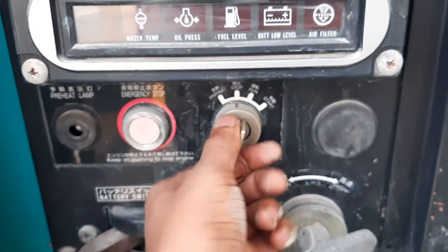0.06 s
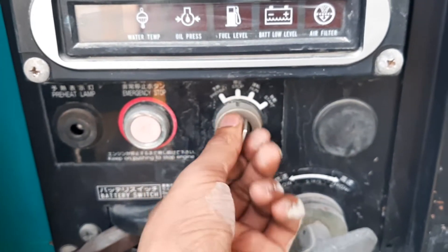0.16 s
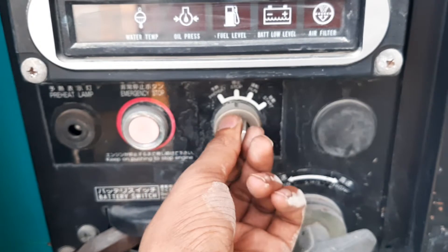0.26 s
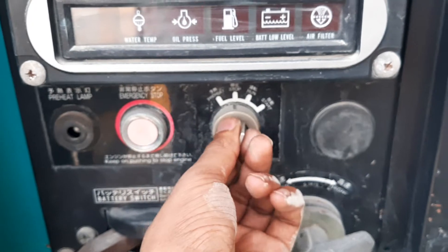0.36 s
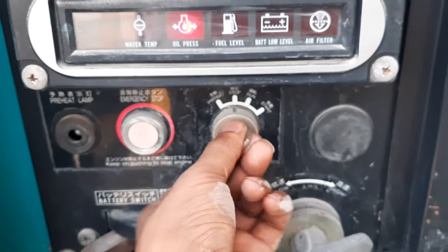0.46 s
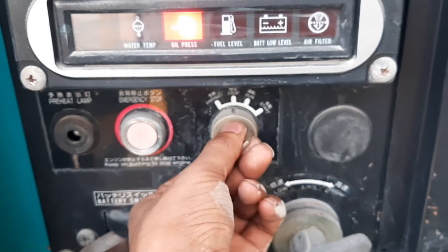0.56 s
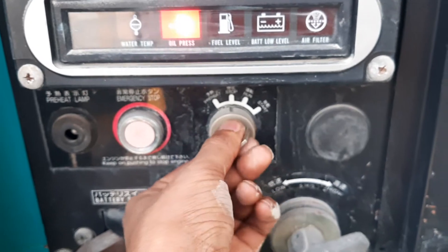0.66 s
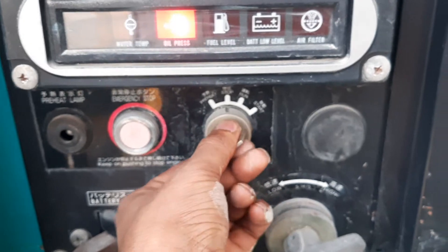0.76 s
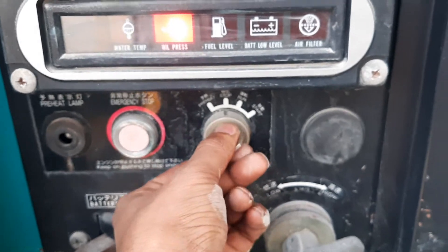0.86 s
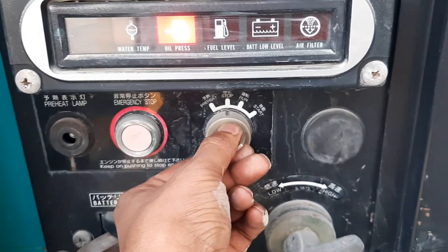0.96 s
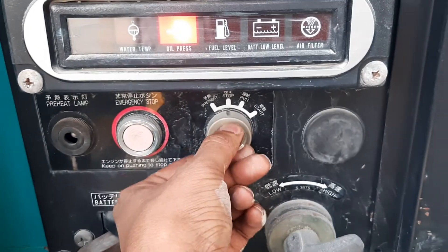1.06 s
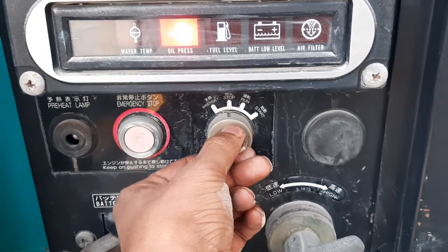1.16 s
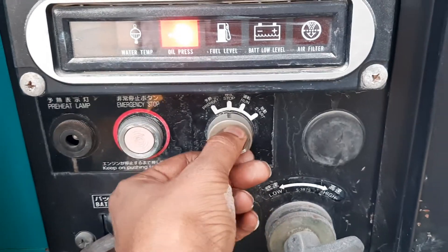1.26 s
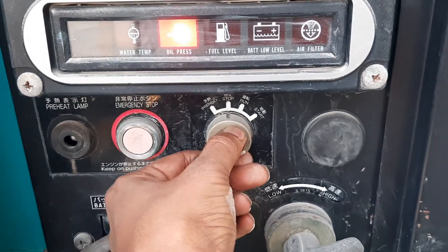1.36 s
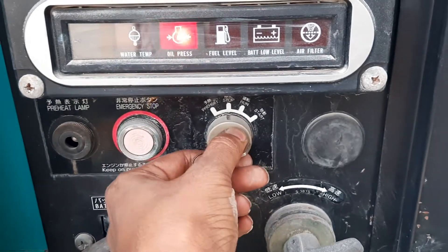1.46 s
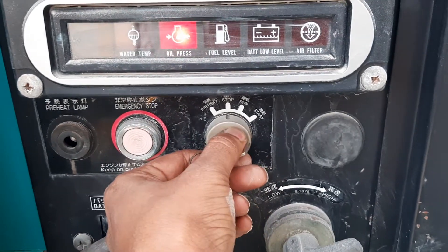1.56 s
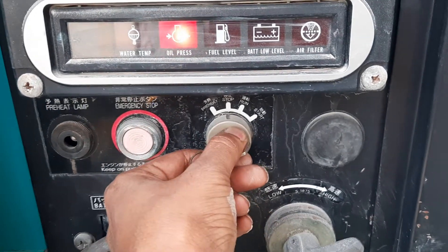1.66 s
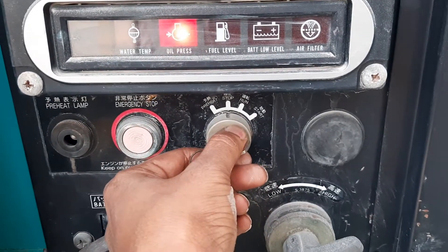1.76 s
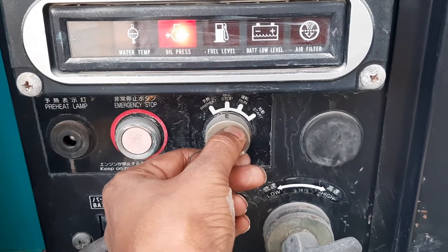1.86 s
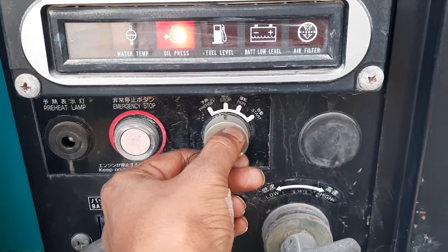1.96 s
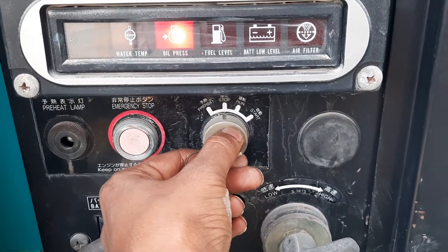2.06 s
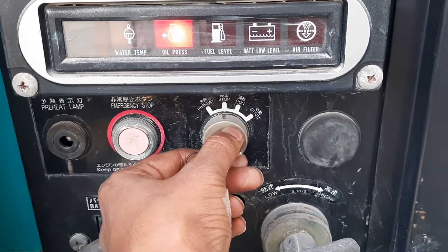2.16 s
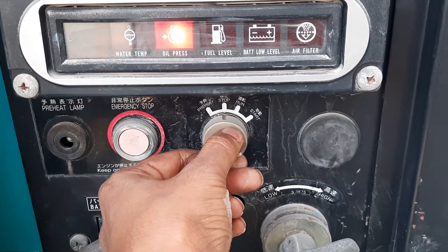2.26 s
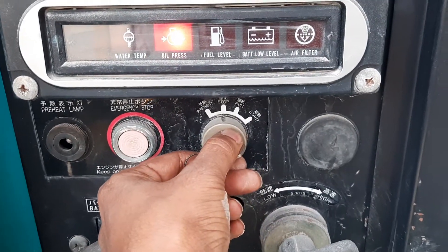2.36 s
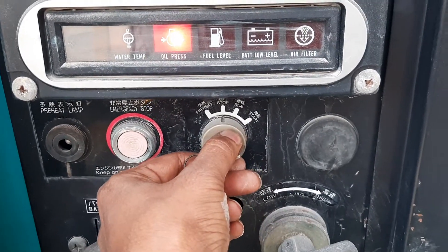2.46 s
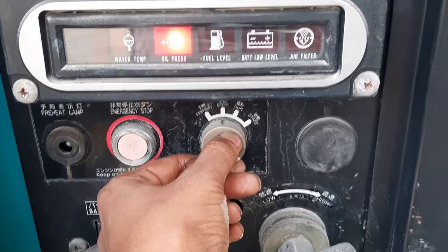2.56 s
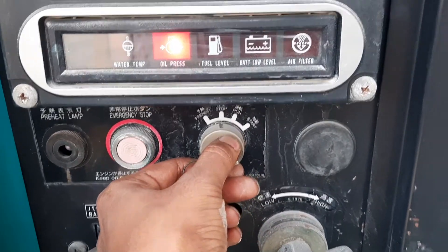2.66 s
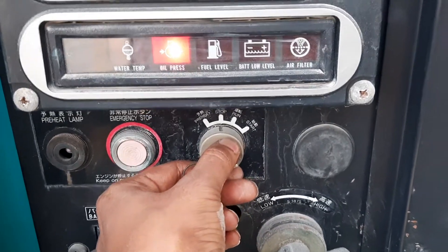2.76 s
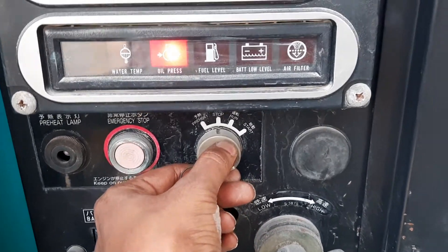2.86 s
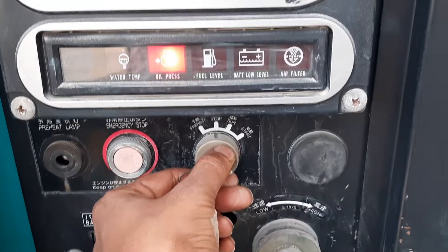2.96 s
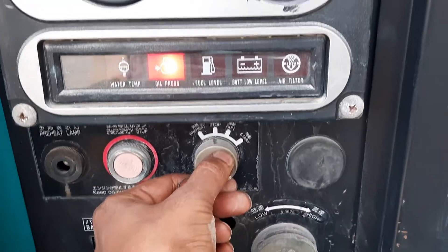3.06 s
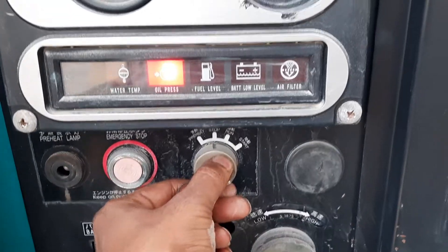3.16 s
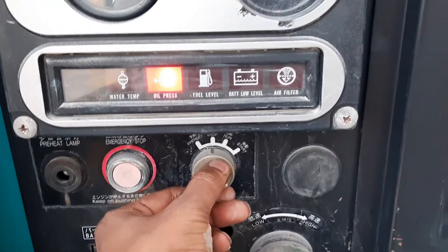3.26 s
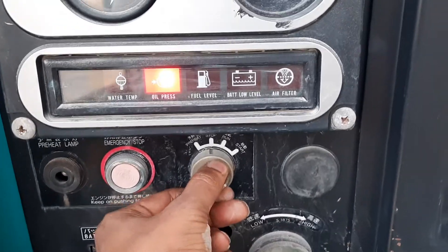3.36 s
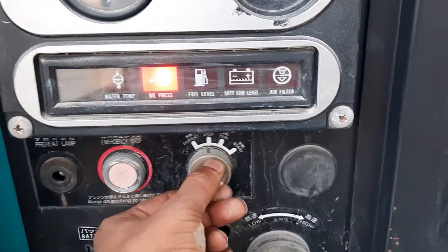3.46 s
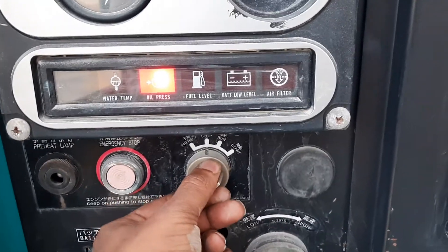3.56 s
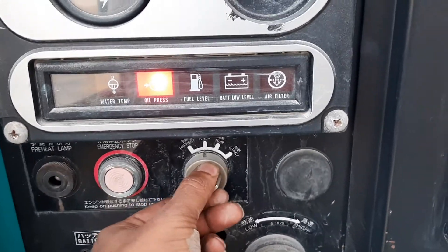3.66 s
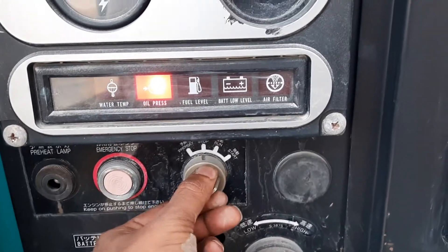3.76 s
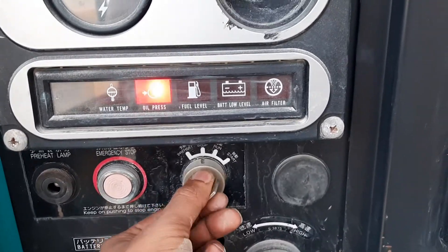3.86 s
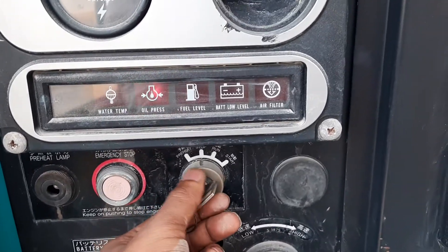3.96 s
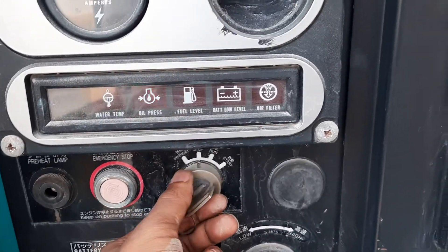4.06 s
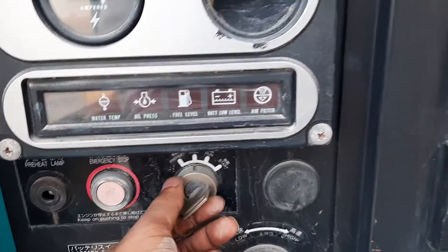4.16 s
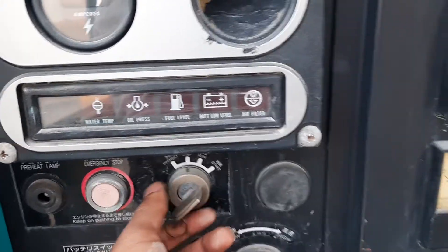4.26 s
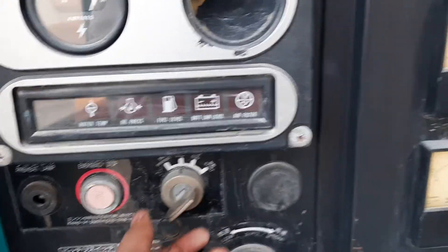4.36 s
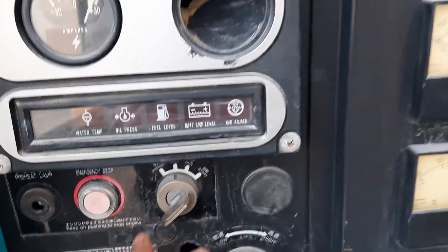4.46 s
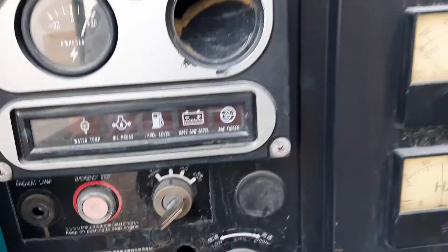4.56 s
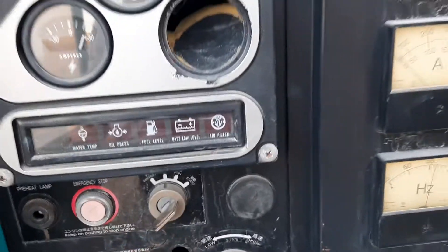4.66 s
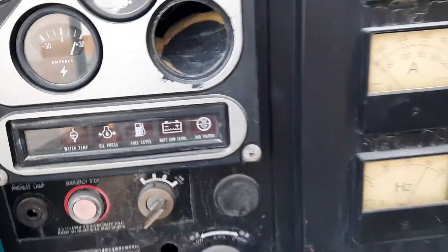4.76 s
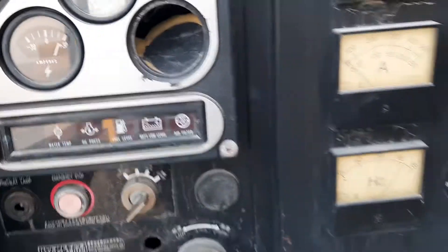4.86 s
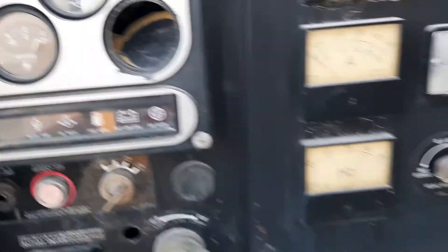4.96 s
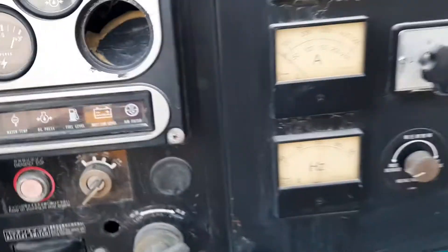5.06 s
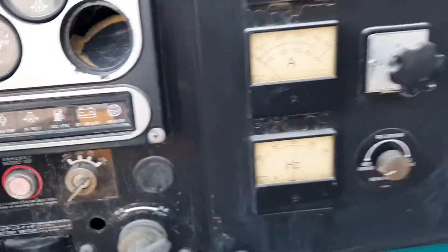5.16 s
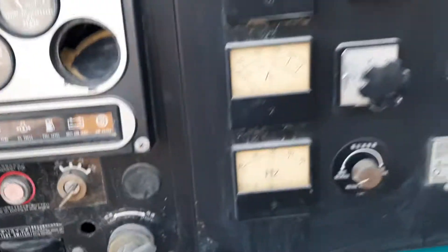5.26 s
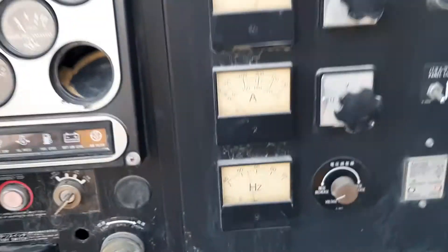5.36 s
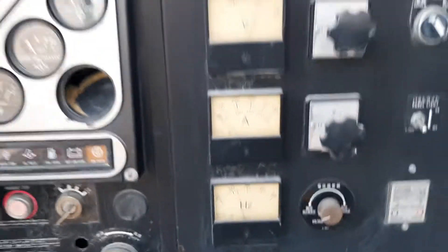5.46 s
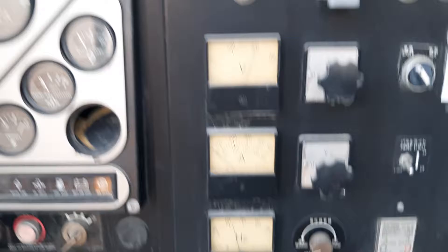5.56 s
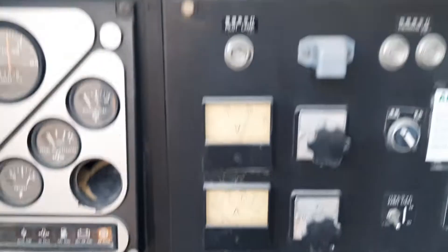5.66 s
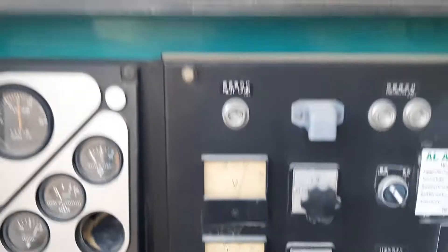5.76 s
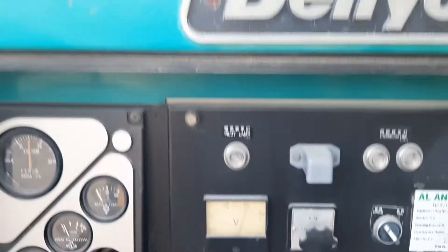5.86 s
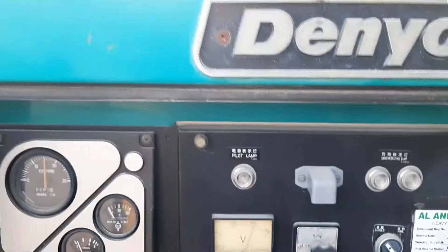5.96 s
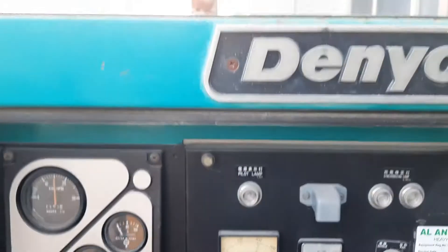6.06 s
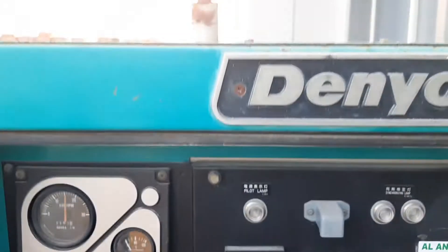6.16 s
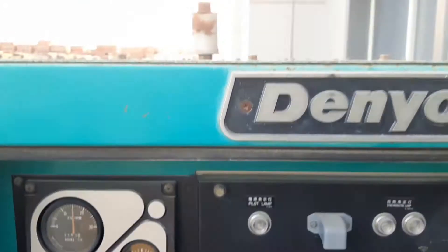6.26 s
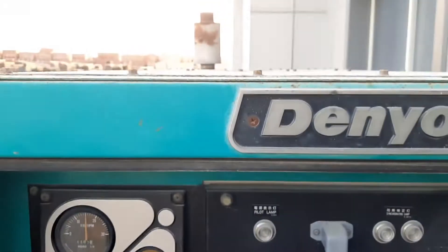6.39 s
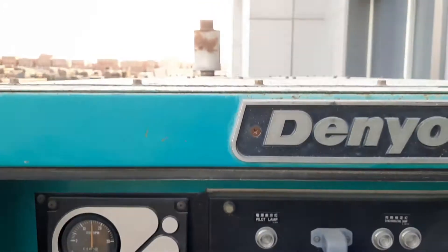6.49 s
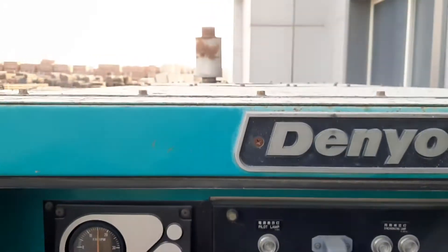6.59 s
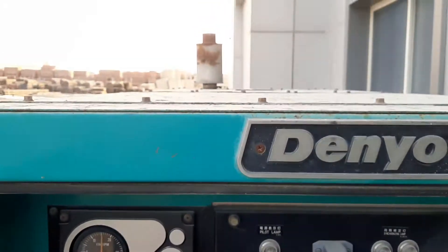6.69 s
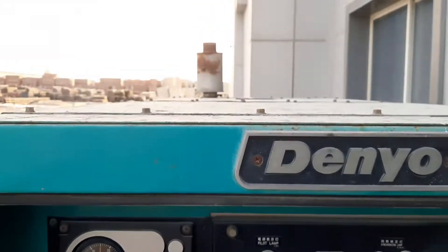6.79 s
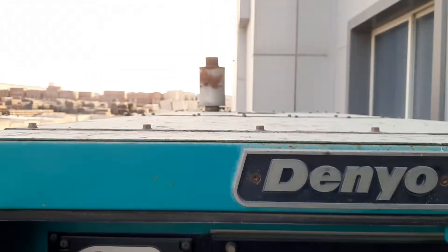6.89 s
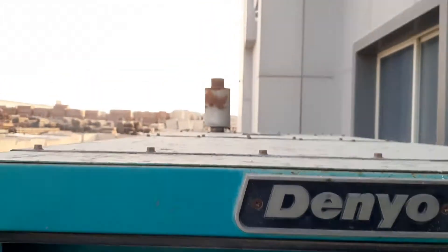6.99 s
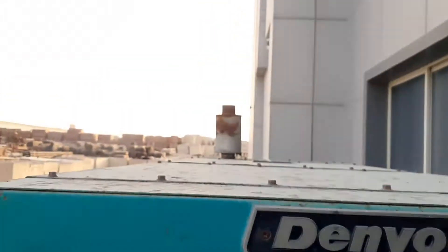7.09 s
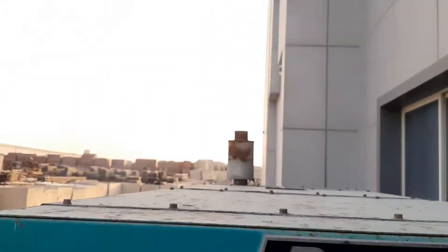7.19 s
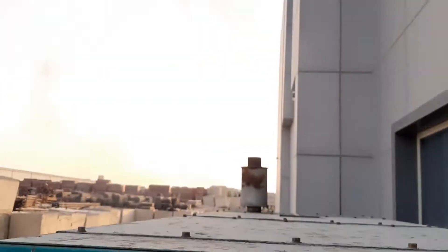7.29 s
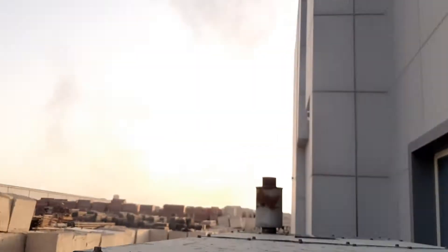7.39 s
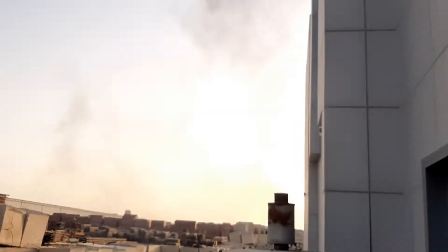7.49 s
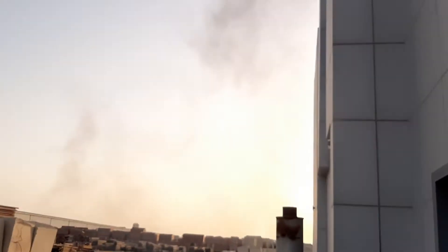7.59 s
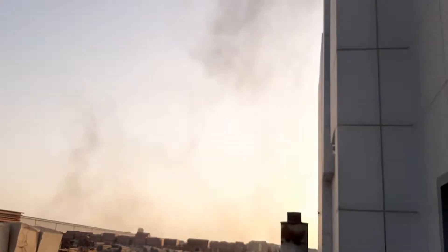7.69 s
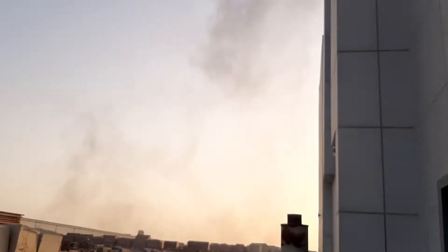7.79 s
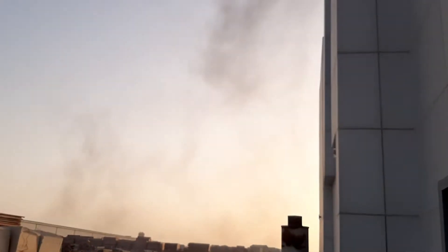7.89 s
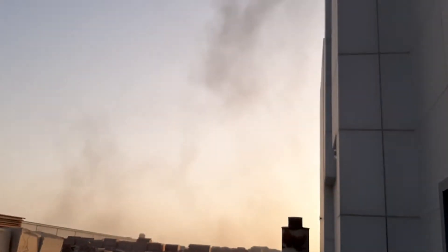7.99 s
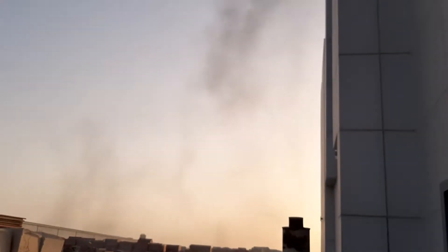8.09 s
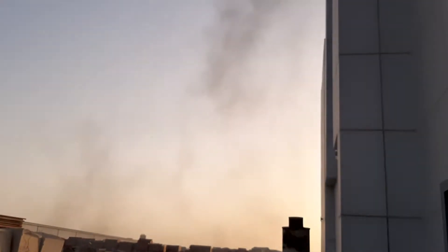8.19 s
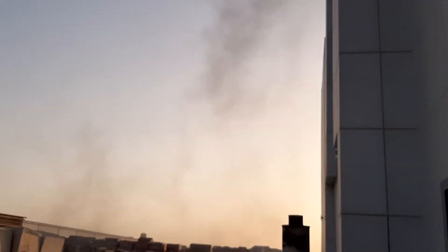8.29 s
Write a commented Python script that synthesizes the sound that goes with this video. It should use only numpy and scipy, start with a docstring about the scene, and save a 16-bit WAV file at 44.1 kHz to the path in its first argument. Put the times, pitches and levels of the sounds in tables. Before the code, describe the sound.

A handheld stereo microphone near a steel generator housing, slightly louder on the right. Key nudges and sharp clicks come first, then a boomy relay thump. A metallic slam starts gritty, surging gear whine with brief squeaks; deep firing jolts shake doors and latches into a rattle. The engine accelerates, blares briefly, then holds a droning, clattering, hissing run, less boxy and more open to exhaust puffs by the end.

```python
"""Over the low sound of distant machinery, a key clicks softly, then louder, and a relay thumps a housing.
A solenoid slams in and starter gears howl in surges: a train of tooth pushes rings through a filter.
A six-cylinder diesel generator catches, shakes its sheet-metal doors into a rattle and climbs to about 1500 rpm.
Filtered noise and ringing strokes make its thuds, knocks and hiss.
Tones that follow the shaft speed make the exhaust note and the drone of the fan."""
import sys
import numpy as np
from scipy import signal
from scipy.fft import rfft, irfft, next_fast_len
from scipy.io import wavfile
from scipy.ndimage import uniform_filter1d, map_coordinates

SR = 44100
rng = np.random.default_rng(int(sys.argv[2]) if len(sys.argv) > 2 else 0)


def file_out(sig):
    """Save sig as 16-bit WAV at sys.argv[1]."""
    # one column per channel
    cols = np.atleast_2d(sig).T
    # limit, then scale
    lim = np.clip(cols, -1, 1)
    pcm = np.round(lim * 32767).astype(np.int16)
    wavfile.write(sys.argv[1], SR, pcm)


N = 367353  # length in samples
TIME = np.arange(N) / SR  # seconds
FREQS = np.fft.rfftfreq(N, 1 / SR)  # Hz


def amp(db):
    """Turns decibels into a gain."""
    return 10 ** (np.asarray(db) / 20)


def unit(x):
    """Scales a sound so that the mean of its channels has rms 1."""
    middle = np.atleast_2d(x).mean(0)
    return x / np.sqrt(np.mean(middle ** 2) + 1e-20)


def ramp(start, end):
    """Rises from 0 to 1 between two times in seconds."""
    return np.clip((TIME - start) / max(end - start, 1e-3), 0, 1)


def read(points, hz):
    """Reads a curve whose points are joined by straight lines on a log frequency axis."""
    point_hz, value = np.transpose(points)
    return np.interp(np.log(hz + 1), np.log(point_hz + 1), value)


def noise(size=N):
    """Two unrelated white noises, one for each channel."""
    return rng.standard_normal((2, size))


def drift(hz):
    """Slow random wandering of rms 1, with about hz new values a second."""
    knots = rng.standard_normal(4000)
    coarse = map_coordinates(knots, [TIME[::50] * hz], order=3, mode="wrap")
    return unit(coarse.repeat(50)[:N])


def blow(s, t60, rise=0.0075):
    """Envelope of one blow: a quick rise, then a steady decay that loses 60 dB in t60 seconds."""
    out = np.zeros(N)
    part = out[round(s * SR):][:int(2 * t60 * SR)]
    age = TIME[:len(part)]
    part += (1 - np.exp(-age / rise)) * np.exp(-np.log(1000) * age / t60)
    return out


def held(start, length, rise, t60):
    """Envelope that rises, holds and dies away."""
    age = np.maximum(TIME - start, 0)
    release = amp(-60 * np.clip((age - length) / t60, 0, 10))
    return (1 - np.exp(-age / rise)) * release


# how alike the two microphones hear each pitch: pitch_hz, likeness (1 = the same, 0 = unrelated)
MIC_LIKENESS = [(60, 1), (160, .99), (250, 0.95), (500, .6), (1000, 0.28), (2000, 0), (4000, 0)]


def colour(x, points, modes=()):
    """Filters noise by a spectrum and its resonances; the microphones share the bass but not the treble."""
    size = 2 * next_fast_len(N // 2 + 8192)
    hz = np.fft.rfftfreq(size, 1 / SR)
    peaks = sum(gain / (1 + (2 * (hz - mode_hz) / width) ** 2) for mode_hz, width, gain in modes)
    db = read(points, hz) + peaks
    # folding the cepstrum makes the filter answer only after each input, never before it
    cepstrum = irfft(np.log(amp(np.maximum(db, -100))))
    cepstrum[1:size // 2] *= 2
    z = rfft(x, size) * np.exp(rfft(cepstrum[:size // 2], size))
    same = np.clip(read(MIC_LIKENESS, hz), -1, 1)
    left = same * z[1] + np.sqrt(1 - same ** 2) * z[0]
    return irfft(np.array([left, z[1]]))[:, :N]


def tones(turns, orders, hz, waver):
    """Wavering harmonics of a turning part; the higher ones reach the two microphones out of step."""
    out = np.zeros((2, N))
    for k, db in orders:
        # hz is a nominal pitch, used only to set the phase gap between the microphones
        apart = np.arccos(np.clip(read(MIC_LIKENESS, k * hz), .3, 1)) * rng.choice([-.5, .5])
        phase = 2 * np.pi * (round(k) * turns + rng.random()) + waver * drift(7.4)
        strength = amp(db) * np.sqrt(2) * (1 + waver * drift(12))
        out += strength * np.cos(np.float32([phase + apart, phase - apart]))
    return out


def housing(x, t60):
    """Dense short echoes between the steel walls, different for each microphone."""
    t = np.arange(SR // 5) / SR
    echoes = noise(len(t)) * amp(-60 * t / t60)
    return signal.oaconvolve(np.atleast_2d(x), echoes, axes=1)[:, :N]


# tone of the distant machinery: pitch_hz, relative_db
YARD_SPECTRUM = [(25, -6), (58, 5), (100, -0.5), (160, 3.5), (250, -4.5), (400, -15.5), (650, -19.5),
                 (1000, -24.5), (1550, -27.5), (2500, -44.5), (8000, -56.5), (13500, -46.5), (16000, -49)]


def yard():
    """Low, steady sound of distant machinery, made from filtered noise."""
    return amp(-46) * unit(colour(noise(), YARD_SPECTRUM))


NUDGE_T60_S = 0.091
# fingers nudge the key in its barrel: start_s, level_db
KEY_NUDGES = [(0.098, -51), (0.184, -52), (0.474, -36)]


def nudges():
    """Fingers nudge the key in its barrel, each time with a short burst of noise."""
    spectrum = [(900, -22.0), (1550, 5.0), (1800, -7), (2050, -6), (2700, -25.5), (8000, -34)]
    bursts = sum(amp(db) * blow(s, NUDGE_T60_S) for s, db in KEY_NUDGES)
    return bursts * unit(colour(noise(), spectrum))


# the key rattles in its barrel, each bounce weaker than the last
BOUNCE_S, BOUNCE_GAP_S, BOUNCE_T60_S = .556, 0.023, 0.078
BOUNCE_DB, BOUNCE_LOSS_DB = -33.5, 1.5


def bounces(count=4):
    """Envelope of the key rattling to rest in evenly spaced, weakening bounces."""
    return sum(amp(BOUNCE_DB - k * BOUNCE_LOSS_DB) * blow(BOUNCE_S + k * BOUNCE_GAP_S, BOUNCE_T60_S)
               for k in range(count))


# key and switch contacts: start_s, level_db, t60_s
CONTACT_CLICKS = [(0.097, -64, 0.07), (0.168, -68, 0.04), (0.482, -47, 0.26), (0.5, -41, 0.17),
                  (0.521, -28.5, 0.063), (0.54, -27, 0.12)]
# tone of the contacts: pitch_hz, relative_db
CONTACT_SPECTRUM = [(180, -27), (300, -10), (546, -33), (725, -19.5), (978, -28), (1560, -21), (2100, -17),
                    (2320, -18.5), (3460, -17.5), (7200, -21.5), (9390, -33), (11100, -24.5),
                    (16000, -26.5)]


def key_clicks():
    """Contacts snap: each noise burst has a very short tick on top; bounces and a faint echo join in."""
    clicks = sum(amp(db) * (blow(s, t60, rise=0.0018) + blow(s, 0.0042, rise=.0004))
                 for s, db, t60 in CONTACT_CLICKS)
    echo = amp(-55) * blow(0.47, 0.61, rise=.02)
    return (clicks + bounces() + echo) * unit(colour(noise(), CONTACT_SPECTRUM))


# ringing of the key and panel: pitch_hz, level_db, t60_s
KEY_RING_MODES = [(1540, -43, 0.24), (2060, -45, 0.23), (4300, -64, 0.43), (5800, -66, 0.6)]


def key_ring():
    """The key and panel ring on as slightly unsteady, fading sine tones."""
    return sum(amp(db) * blow(0.61, t60)
               * np.sin(2 * np.pi * (hz * TIME + rng.random((2, 1))) + 1.2 * drift(90))
               for hz, db, t60 in KEY_RING_MODES)


# tone of the booming housing: pitch_hz, relative_db
BOOM_SPECTRUM = [(35, -35), (60, -24), (95, -4), (170, 6), (250, -9.5), (380, -16.5), (600, -25),
                 (1100, -72.5)]


def relay():
    """A relay snaps and its thump makes the housing boom, first briefly and then for longer."""
    spectrum = [(300, -11.5), (550, -11.5), (720, -2), (950, -17.5), (1600, -14), (2100, -20), (4000, -41.0)]
    snap = amp(-29.0) * blow(.541, 0.31, rise=.001) * unit(colour(noise(), spectrum))
    boom = amp(-24.5) * blow(.541, 0.29, rise=0.0051) + amp(-32.0) * blow(0.555, 1.6, rise=0.028)
    return snap + boom * unit(colour(noise(), BOOM_SPECTRUM))


def key():
    """The key is nudged, its contacts snap and ring, and a relay thumps the housing."""
    return nudges() + key_clicks() + key_ring() + relay()


SQUEAK_RISE_S, SQUEAK_T60_S = 0.012, 0.19
# thin squeaks of spinning parts: start_s, length_s, pitch_hz, glide_hz_per_s, level_db
SPIN_SQUEAKS = [(2.05, 0.065, 3060, 7000, -42), (2.16, 0.05, 3350, 5500, -45),
                (3.165, 0.065, 4110, 13, -42)]


def squeaks():
    """Short, rough whistles that glide upward and echo in the housing."""
    out = np.zeros(N)
    for s, length, hz, glide, db in SPIN_SQUEAKS:
        roughness = 1 + .03 * drift(900)
        pitch = (hz + glide * np.clip(TIME - s, 0, 2 * length)) * roughness
        whistle = np.sin(2 * np.pi * np.cumsum(pitch) / SR)
        out += amp(db) * held(s, length, SQUEAK_RISE_S, SQUEAK_T60_S) * whistle
    return out + out.std() * unit(housing(out, .06))


TINKLE_PER_S, TINKLE_T60_S = 130, .05
TINKLE_DB, TINKLE_FADE_DB_PER_S = -47, 8
# ringing of a loose steel fitting: pitch_hz, relative_db
FITTING_MODES = [(3590, 6), (4150, 8), (4340, -6), (5200, -8), (5650, -4)]


def tinkle():
    """A loose steel fitting is struck at random and rings, less and less as the seconds pass."""
    t = TIME[:SR // 4]
    hits = (rng.random(N) < TINKLE_PER_S / SR) * rng.uniform(0.41, 1, N)
    ring = sum(amp(db - 60 * t / TINKLE_T60_S) * np.sin(2 * np.pi * (hz * t + rng.random((2, 1))))
               for hz, db in FITTING_MODES)
    rung = unit(signal.oaconvolve(hits[None], ring, axes=1)[:, :N] * (1 + .5 * drift(150)))
    fade = amp(TINKLE_DB - TINKLE_FADE_DB_PER_S * np.maximum(TIME - 3, 0))
    return rung * fade * ramp(2.8, 3) * (1 - ramp(4.1, 4.25))


# no two teeth are alike: spread of their force, and random wobble of the rate as a share of it
TOOTH_SPREAD_DB, TOOTH_JITTER = 4.5, .016
# an idler gear beats against the pinion: rate as a share of the tooth rate, and depth 0-1
IDLER_SHARE, IDLER_DEPTH = .41, .45
# backlash lets each tooth land early or late (share of a tooth); the force of the mesh shudders
BACKLASH, SHUDDER_DB = .042, 2.2
# rate at which the pinion teeth mesh: it sags under each compression and leaps
# as the engine begins to fire: time_s, rate_hz
TOOTH_RATE_CURVE = [(1.49, 660), (1.55, 775), (1.58, 800), (1.62, 665), (1.685, 790), (1.73, 862),
                    (1.755, 886), (1.79, 845), (1.825, 760), (1.922, 728), (1.93, 1200), (1.97, 1095),
                    (2.01, 1010), (2.095, 990), (2.105, 1400), (2.125, 1250), (2.15, 1345), (2.21, 1380),
                    (2.225, 1600)]
# ringing of the flywheel housing under the teeth: pitch_hz, relative_db
GEAR_BODY_SPECTRUM = [(200, -35), (400, -1), (560, -6), (740, 3), (1050, 3), (1350, 3), (1650, 2),
                      (2150, -.5), (2500, -1.5), (2800, -12), (3500, -14), (4350, -8), (5200, -18),
                      (7000, -26), (12000, -44)]


def teeth(count=18):
    """One push for each meshing tooth; the uneven wear repeats, so side tones glide along with the howl."""
    rate = np.interp(TIME, *np.transpose(TOOTH_RATE_CURVE)) * (1 + TOOTH_JITTER * drift(450))
    turns = np.cumsum(rate) / SR  # counted in teeth
    tooth = turns.astype(int)
    wear = amp(TOOTH_SPREAD_DB * unit(rng.standard_normal(count)))[tooth % count]
    late = BACKLASH * rng.standard_normal(N)[tooth]
    idler = 1 + IDLER_DEPTH * np.cos(2 * np.pi * IDLER_SHARE * turns)
    pushes = np.exp(-((turns % 1 - .5 - late) / .04) ** 2) * wear * idler
    rung = colour(np.array([pushes, pushes]) - pushes.mean(), GEAR_BODY_SPECTRUM)[1]
    # even out the strength over 40 ms, then let it shudder
    even = rung / np.sqrt(uniform_filter1d(rung ** 2, SR // 25) + 1e-12)
    return amp(SHUDDER_DB * drift(110)) * even


SURGE_RISE_S = .011
GEAR_ECHO_DB = -2  # echo in the housing, relative to the howl
# surges of the starter: start_s, length_s, howl_db, grinding_db, release_t60_s
STARTER_SURGES = [(1.5, 0.16, -24.5, -22.5, .25), (1.665, .165, -19, -25.5, .38),
                  (1.93, 0.08, -18.5, -26, .22), (2.114, 0.026, -15, -22.5, .15),
                  (2.225, .02, -33, -31, .15)]
# tone of the grinding gears, also used for the dull part of the slams: pitch_hz, relative_db
GEAR_SPECTRUM = [(210, -40), (350, 0.5), (385, 5), (557, -8.5), (719, 3), (1220, -6.5), (1570, 2),
                 (2390, -14), (2800, -21), (4240, -17), (8440, -27.5), (12200, -26), (16000, -36)]


def gears():
    """The teeth howl and grind in surges, with echoes from the housing."""
    loads = [(held(s, length, SURGE_RISE_S, t60), howl_db, grind_db)
             for s, length, howl_db, grind_db, t60 in STARTER_SURGES]
    howl = teeth() * sum(amp(db) * load for load, db, _ in loads)
    howl = howl + amp(GEAR_ECHO_DB) * howl.std() * unit(housing(howl, .07))
    rough = unit(colour(noise() * amp(2 * drift(300)), GEAR_SPECTRUM))
    grind = sum(amp(db) * load for load, _, db in loads) * rough
    return howl + grind


# solenoid and pinion slamming home: start_s, level_db, t60_s, bright_share (0-1)
SOLENOID_SLAMS = [(1.439, -12, 0.18, 0.41), (1.47, -13.5, 0.15, 0.87), (1.658, -19, 0.13, 0.8)]
# ringing of the solenoid: pitch_hz, width_hz, boost_db
SOLENOID_RING = [(860, 240, 27), (2000, 650, 33)]


def slams():
    """The solenoid throws the pinion home: dull and bright noise bursts share each blow."""
    dull = sum(amp(db) * np.sqrt(np.clip(1 - bright, 0, 1)) * blow(s, t60, rise=0.0028)
               for s, db, t60, bright in SOLENOID_SLAMS)
    sharp = sum(amp(db) * np.sqrt(abs(bright)) * blow(s, t60) for s, db, t60, bright in SOLENOID_SLAMS)
    steel = [(500, -8.5), (2000, -3.5), (4000, -5.5), (6800, -4.0), (8500, -22.0), (12000, -11.0), (16000, -18)]
    dull_noise = unit(colour(noise(), GEAR_SPECTRUM, SOLENOID_RING))
    return dull * dull_noise + sharp * unit(colour(noise(), steel))


# dull clunk as the pinion takes up the ring gear: start_s, level_db, t60_s
RING_GEAR_CLUNK = (1.495, -12.5, 0.16)
# tone of the clunk: pitch_hz, relative_db
CLUNK_SPECTRUM = [(250, -25), (420, 3), (560, -14), (900, -6), (1500, -43), (5000, -70)]


def clunk():
    """The pinion takes up the ring gear with one dull burst of noise."""
    s, db, t60 = RING_GEAR_CLUNK
    return amp(db) * blow(s, t60) * unit(colour(noise(), CLUNK_SPECTRUM))


# brushes and bearings of the starter: start_s, length_s, level_db
BRUSH_HISS = (1.55, 0.483, -39.5)


def brushes():
    """Brushes and bearings of the spinning starter hiss, then die away."""
    start, length, db = BRUSH_HISS
    spectrum = [(1500, -23), (2600, 3), (4300, 6), (7000, 1), (9000, -25), (16000, -8)]
    return amp(db) * held(start, length, 0.03, 0.47) * unit(colour(noise(), spectrum))


def starter():
    """The solenoid slams, the ring gear clunks, the brushes hiss and the gears howl."""
    return slams() + clunk() + brushes() + gears()


# small loose parts chatter between the big knocks
CHATTER_PER_S, CHATTER_SPREAD_DB = 260, 4
CHATTER_DB, CHATTER_T60_S = -25, 0.061
# loudest knocks of the loose doors and latches: start_s, clang_relative_db, tick_relative_db
DOOR_RATTLES = [(2.348, -22, -42), (2.401, -14, -25), (2.451, -23, -44), (2.494, -25, -46),
                (2.576, -17.5, -33), (2.625, -31, -38), (2.703, -11, -18), (2.7327, -14, -23),
                (2.747, -26, -34), (2.7653, -13, -21), (2.775, -22, -30), (2.795, -29, -22),
                (2.811, -19, -22), (2.839, -14, -19), (2.855, -17, -26), (2.865, -15, -21),
                (2.884, -17, -31), (2.908, -9.5, -32), (2.925, -15, -34), (2.9566, -17, -36),
                (2.973, -14, -34), (3.138, -22, -38), (3.306, -25, -33), (3.351, -21.5, -31)]
# tone of the sheet metal: pitch_hz, relative_db
METAL_SPECTRUM = [(290, -13), (500, -1.5), (668, -9.5), (729, 3), (795, -9.5), (1210, -13), (1740, -6.5),
                  (3150, -14), (5630, -11), (8700, -24.5), (12300, -25), (16000, -28)]


def doors():
    """Loose doors and latches clang and tick one by one, with random chatter of small parts between."""
    ring = sum(amp(db) * (blow(s, 0.06, rise=0.00098) + 0.13 * blow(s, 0.32)) for s, db, _ in DOOR_RATTLES)
    crack = sum(amp(db) * blow(s, 0.034, rise=0.00031) for s, _, db in DOOR_RATTLES)
    strength = amp(CHATTER_SPREAD_DB * np.minimum(rng.standard_normal(N), 1.5))
    hits = (rng.random(N) < CHATTER_PER_S / SR) * strength
    # each hit adds energy, which then fades
    energy = signal.lfilter([1], [1, -amp(-120 / (CHATTER_T60_S * SR))], hits ** 2)
    chatter = unit(np.sqrt(energy))
    chatter *= amp(CHATTER_DB) * ramp(2.65, 2.706) * (1 - ramp(2.85, 3.12))
    clang = np.hypot(amp(-5.0) * ring, chatter) * unit(colour(noise(), METAL_SPECTRUM))
    edge = [(1500, -25), (5000, -6), (8500, -3), (12500, 14), (16000, 5)]
    return clang + amp(-2.5) * crack * unit(colour(noise(), edge))


# run-up: the starter turns the shaft, the first firings speed it up, then all cylinders pull
CRANK_S, ALL_FIRING_S = 1.48, 3.22
CRANK_TURNS_PER_S, GOVERNED_TURNS_PER_S = 2.4, 25.08
SLOW_TURNS_PER_S2, FAST_TURNS_PER_S2 = 6.1, 13.1  # the two rates of climb
EASE_TURNS_PER_S = .9  # how gently the climb bends into the governed speed


def shaft_speed():
    """Crankshaft turns per second: a slow climb, a fast one, and an easing into the governed speed."""
    slow = SLOW_TURNS_PER_S2 * (np.clip(TIME, CRANK_S, ALL_FIRING_S) - CRANK_S)
    fast = FAST_TURNS_PER_S2 * np.maximum(TIME - ALL_FIRING_S, 0)
    free = CRANK_TURNS_PER_S + slow + fast
    ease = EASE_TURNS_PER_S
    return -ease * np.logaddexp(-free / ease, -GOVERNED_TURNS_PER_S / ease)


# the governor cuts the fuel back over this last stretch of speed
GOVERNOR_TURNS_PER_S = 1


def fuel(speed):
    """Extra fuel, 0-1: full until the speed nears the governed one."""
    return np.clip((GOVERNED_TURNS_PER_S - speed) / GOVERNOR_TURNS_PER_S, 0, 1)


# speed at which the engine rocks hardest on its mounts, and the half width of that resonance
MOUNT_TURNS_PER_S, MOUNT_WIDTH_TURNS_PER_S = 10.1, 3.5
# the microphone is lifted out of the boomy panel recess into sight of the exhaust pipe
LIFT_START_S, LIFT_END_S = 4.86, 6.6


def level(law, speed):
    """Gain of one engine sound from speed, fuel, rocking on the mounts and the place of the microphone."""
    steady_db, speed_db, fuel_db, rocking_db, lifted_db = law
    rocking = 1 / (1 + ((speed - MOUNT_TURNS_PER_S) / MOUNT_WIDTH_TURNS_PER_S) ** 2)
    return amp(steady_db + speed_db * np.log2(speed / GOVERNED_TURNS_PER_S) + fuel_db * fuel(speed)
               + rocking_db * rocking + lifted_db * ramp(LIFT_START_S, LIFT_END_S))


STROKE_SPREAD_DB = 2.2  # no two strokes are equally strong


def strokes(speed, t60, count=14):
    """Firings and valves strike at fixed places in the two-turn cycle, each with a ring of its own."""
    t, turns = TIME[:SR // 8], np.cumsum(speed) / SR
    out = np.zeros((2, N + len(t)))
    for place in (np.arange(count) + .5 * rng.random(count)) / count:
        ring = noise(len(t)) * amp(-60 * t / t60)
        force = amp(STROKE_SPREAD_DB * rng.standard_normal(200))
        starts = np.searchsorted(turns / 2, np.arange(place, turns[-1] / 2))
        for at, size in zip(starts, force):
            out[:, at:at + len(t)] += size * ring
    return unit(out[:, :N] / np.sqrt(speed))


# the block heaves as the starter takes hold
HEAVE_S, HEAVE_HOLD_S, HEAVE_T60_S, HEAVE_DB = 1.496, 0.13, 1, -14.5
JOLT_RISE_S, JOLT_T60_S = 0.0021, 0.21
# first hard firings, which jolt the housing: start_s, level_db
FIRING_JOLTS = [(2.46, -12.5), (2.585, -17), (2.765, -13), (2.9, -11.5)]
# level rules, one value each: at_governed_speed_db, per_doubling_of_speed_db,
# extra_at_full_fuel_db, extra_while_rocking_db, extra_once_lifted_db
LURCH_LEVEL = (-20.5, 4.5, 1.5, 9, 0)
RUMBLE_LEVEL = (-25, 1, 2, 2.5, 2)
# tones of the lurching and of the running rumble: pitch_hz, relative_db
LURCH_SPECTRUM = [(15, -71.5), (25, -30.5), (59, -4), (157, 2), (210, -5), (274, -6), (357, -9.5),
                  (408, -15.5), (518, -18.5), (554, -24), (600, -20.5), (780, -67), (1320, -120)]
RUMBLE_SPECTRUM = [(20, -19.5), (35, -69), (52, -13.5), (90, -10), (115, -6.5), (160, -6.5), (210, -9.5),
                   (290, -6.5), (370, -8.5), (460, -17), (600, -18.5), (1300, -66.5)]


def shake(speed, turns, puff, running):
    """Firings thud in the housing: separate lurches at first, blending into a steady rumble."""
    firings = np.diff(np.floor(3 * turns), prepend=0)
    kicks = firings * amp(2 * drift(30)) / np.sqrt(speed)  # one push a firing
    pushes = unit(noise() * (.8 + puff)) + .8 * ramp(2.2, 2.5) * unit(kicks)
    lurch = unit(colour(pushes, LURCH_SPECTRUM))
    rumble = unit(colour(unit(noise()) + .5 * strokes(speed, 0.1), RUMBLE_SPECTRUM))
    jolts = amp(HEAVE_DB) * held(HEAVE_S, HEAVE_HOLD_S, 0.0037, HEAVE_T60_S)
    jolts = jolts + sum(amp(db) * blow(s, JOLT_T60_S, JOLT_RISE_S) for s, db in FIRING_JOLTS)
    lurching = np.hypot(jolts, level(LURCH_LEVEL, speed) * ramp(CRANK_S, HEAVE_S))
    return lurching * np.sqrt(1 - running) * lurch + level(RUMBLE_LEVEL, speed) * np.sqrt(running) * rumble


# hollow of the panel recess: pitch_hz, relative_db
RECESS_SPECTRUM = [(50, -39), (100, 3.5), (150, 7.5), (190, 0), (260, -9), (500, -44)]


def recess_and_pipe(puff):
    """The hollow boom of the panel recess gives way to puffs from the pipe as the microphone is lifted."""
    lifted = ramp(LIFT_START_S, LIFT_END_S)
    recess = amp(-18.0) * unit(colour(noise(), RECESS_SPECTRUM)) * ramp(3.48, 4.17) * (1 - lifted)
    spectrum = [(150, -17.5), (290, 19.5), (420, 12.0), (590, 26.0), (850, -22.0)]
    pipe = amp(-35.5) * unit(colour(noise() * (1.0 + puff), spectrum)) * lifted
    return recess + pipe


# the clatter swings once a cycle: depth 0-1, and how much that depth wanders
LOPE_CYCLE, LOPE_WANDER = .1, .7
# loose tappets and covers clack out of step with the shaft: spread of their rate (natural log)
STRAY = .45
COLD_KNOCK_DB, HARD_KNOCK_DB = -36, -39.5  # before fuel and run-up scale them
# level rules, one value each: at_governed_speed_db, per_doubling_of_speed_db,
# extra_at_full_fuel_db, extra_while_rocking_db, extra_once_lifted_db
KNOCK_LEVEL = (-30.5, 3, 4.5, 3.5, -1.5)
HISS_LEVEL = (-41, 2, 4, 5.5, -1)
# ringing of the block and housing: pitch_hz, width_hz, boost_db
BLOCK_RING = [(752, 16, 7.5), (864, 11, 7.5), (1062, 130, 5.5), (1174, 79, 0), (1138, 22, 2),
              (1544, 197, 8.5), (1780, 45, 2), (2050, 95, 6)]
# tones of the block's knock, the harsh cold knock on full fuel,
# the hardest cylinder's own knock, and the hiss: pitch_hz, relative_db
KNOCK_SPECTRUM = [(250, -35.5), (400, -8.5), (600, 4), (1000, 0.5), (1600, -4), (2300, -3.5), (3000, -12.5),
                  (5000, -26), (8000, -65)]
COLD_KNOCK_SPECTRUM = [(900, -16), (1250, -10), (1400, 6), (1550, -1), (1750, -10), (2600, -29)]
HARD_KNOCK_SPECTRUM = [(300, -50), (800, -20), (1150, 0), (1350, -4), (1550, 1), (1850, -8), (2200, -5),
                       (2900, -24), (6000, -65)]
HISS_SPECTRUM = [(1530, -11.5), (2600, -4), (3270, -7.5), (5270, -10), (10100, -25), (12200, -19.5),
                 (15100, -29.5), (16000, -40)]


def knock_and_hiss(speed, turns, running):
    """Strokes ring the block and rough noise hisses; one cylinder knocks harder once a cycle."""
    lope = 1 + ramp(3.5, 4.2) * LOPE_CYCLE * np.cos(np.pi * turns) * (1 + LOPE_WANDER * drift(9))
    stray = strokes(speed * np.exp(STRAY * drift(60)), 0.03, count=9)
    steady = (.5 + .5 * running) * strokes(speed, 0.045)
    rough = .5 * unit(noise()) * amp(0.91 * drift(120))
    clatter = lope * (.5 * running * stray + steady + rough)
    knock = level(KNOCK_LEVEL, speed) * unit(colour(clatter, KNOCK_SPECTRUM, BLOCK_RING))
    cold = unit(colour(clatter, COLD_KNOCK_SPECTRUM))
    knock = knock + amp(COLD_KNOCK_DB) * ramp(3.1, 3.3) * fuel(speed) * cold
    hard = np.cos(np.pi * turns / 2) ** 4 * amp(STROKE_SPREAD_DB * drift(60))
    knock = knock + amp(HARD_KNOCK_DB) * running * unit(colour(noise() * hard, HARD_KNOCK_SPECTRUM))
    spray = unit(noise()) * amp(1.2 * drift(250)) + 0.48 * stray
    hiss = level(HISS_LEVEL, speed) * unit(colour(spray, HISS_SPECTRUM))
    return (knock + hiss) * ramp(1.41, 2.42)


BLADES_PER_TURN = 5.155  # fan blades passing for each turn of the crankshaft
# the firing note softens for a moment around this time
COAST_S, COAST_WIDTH_S, COAST_DB = 4.48, 0.5, -6.5
# level rules, one value each: at_governed_speed_db, per_doubling_of_speed_db,
# extra_at_full_fuel_db, extra_while_rocking_db, extra_once_lifted_db
EXHAUST_LEVEL = (-25.5, 21.5, 12.5, -14, 3)
FAN_LEVEL = (-21.5, 8, 4.5, 0, -2.5)
# exhaust and block tones: multiple_of_cycle (two turns), relative_db
ENGINE_TONES = [(9, -6.5), (12, -21.5), (14, -35), (21, -8.5), (24, -5), (31, -7), (33, -11), (48, -17.5),
                (64, -21), (72, -15), (83, -20), (86, -12.5), (106, -24), (122, -21), (132, -16),
                (144, -19)]
# whine of the timing gears: multiple_of_cycle (two turns), relative_db
WHINE_TONES = [(91, -17.5), (92, -18.5), (93, -18)]
# fan tones: multiple_of_blade_rate, relative_db
FAN_TONES = [(1, 0.5), (2, -7.5), (3, -13), (4, -14.5), (8, -34), (9, -36)]


def drone(speed):
    """The firing note and its overtones, timing gear whine, and the blade note of the belt-driven fan."""
    turns = np.cumsum(speed) / SR
    blade_turns = BLADES_PER_TURN * turns
    softening = amp(COAST_DB * np.exp(-((TIME - COAST_S) / COAST_WIDTH_S) ** 2))
    firing = level(EXHAUST_LEVEL, speed) * softening * tones(3 * turns, [(1, 0)], 75, waver=.06) * ramp(3, 3.3)
    swell = ramp(3.3, 3.6) * (0.56 + 0.13 * ramp(1.4, 8.2))
    overtones = amp(-24.0) * swell * tones(turns / 2, ENGINE_TONES, 12.4, waver=0.24)
    fan = level(FAN_LEVEL, speed) * tones(blade_turns, FAN_TONES[:1], 129, waver=.2) * ramp(3.85, 3.97)
    blades = amp(-28.5) * tones(blade_turns, FAN_TONES[1:], 104, waver=0.41) * ramp(3.6, 4.0)
    # full fuel hardens the exhaust until the governor cuts back
    pulling = ramp(3.54, 3.93) * fuel(speed)
    harsh = [(2, 0), (3, -9), (4, -10), (5, -14), (6, -16)]  # multiple of the firing rate, relative dB
    blare = amp(-21) * pulling * tones(3 * turns, harsh, 70, waver=.25)
    whine = amp(-21.5) * ramp(4.4, 5.05) * tones(turns / 2, WHINE_TONES, 19.0, waver=0.3)
    return firing + overtones + whine + fan + blades + blare


# the speed wanders slightly at random: share of the speed, and rate
HUNT_SHARE, HUNT_HZ = .002, 2.5


def engine():
    """Firings thud and knock in the housing and block; exhaust and fan sing in step with the shaft."""
    speed = shaft_speed() * (1 + HUNT_SHARE * drift(HUNT_HZ))
    turns = np.cumsum(speed) / SR
    puff = np.exp(-(3 * turns % 1) * 3)  # three firings a turn
    running = ramp(3.34, 4.5)  # blend from lurching to smooth running
    thuds = shake(speed, turns, puff, running)
    return thuds + recess_and_pipe(puff) + knock_and_hiss(speed, turns, running) + drone(speed)


# balance of the two microphones: pitch_hz, left_minus_right_db
MIC_TILT = [(60, -5.5), (110, -5), (200, -3.5), (380, -2.5), (700, -4), (1290, -5.5), (2380, -4),
            (4400, -8), (8120, -3), (15000, -1.5)]


def scene():
    """All sources together, a little louder in the right microphone."""
    dry = yard() + key() + starter() + squeaks() + engine() + doors() + tinkle()
    left = amp(read(MIC_TILT, FREQS))
    balance = np.array([left, np.ones_like(left)]) * 2 / (1 + left)
    return irfft(rfft(dry) * balance, N)


EDGE_HZ = 15900  # upper limit of the treble


def record(dry):
    """Rounds off peaks near full scale, then removes the highest treble."""
    taps = signal.firwin(511, EDGE_HZ, window=("kaiser", 9), fs=SR)
    rounded = dry / (1 + dry ** 8) ** (1 / 8)
    return signal.oaconvolve(rounded, taps[None], "same")


dry = scene()
out = record(dry)
file_out(out)
```